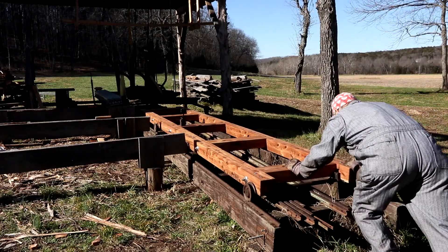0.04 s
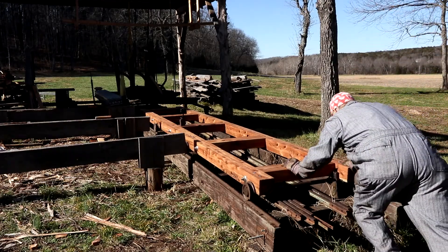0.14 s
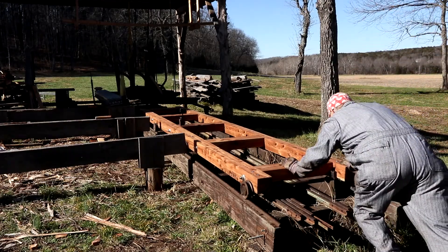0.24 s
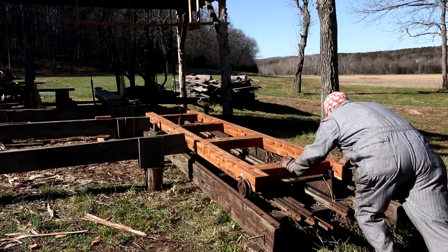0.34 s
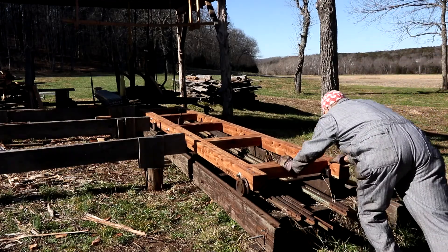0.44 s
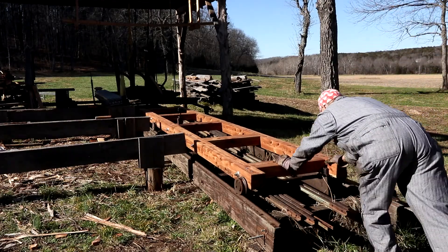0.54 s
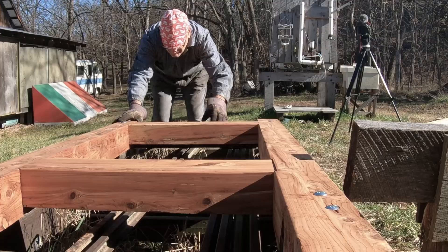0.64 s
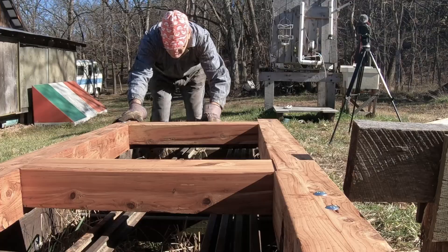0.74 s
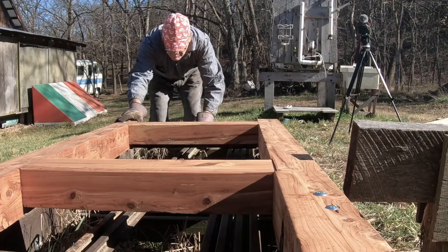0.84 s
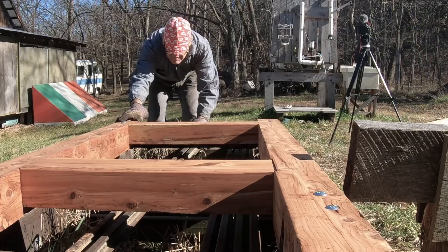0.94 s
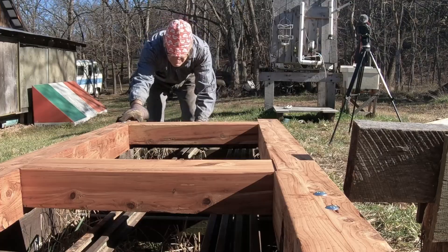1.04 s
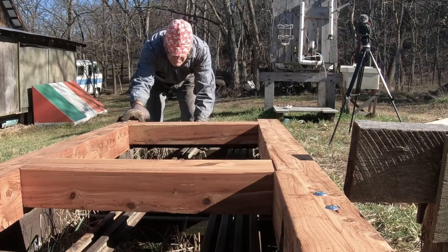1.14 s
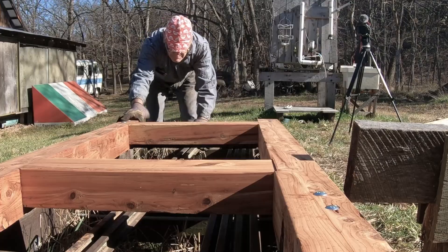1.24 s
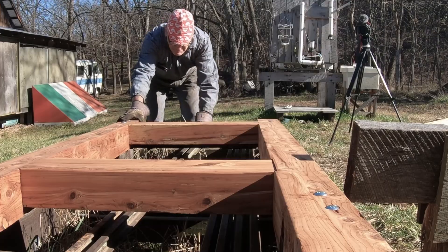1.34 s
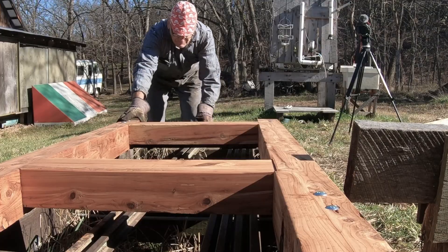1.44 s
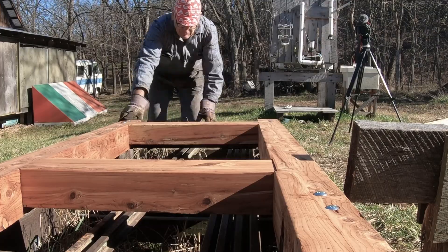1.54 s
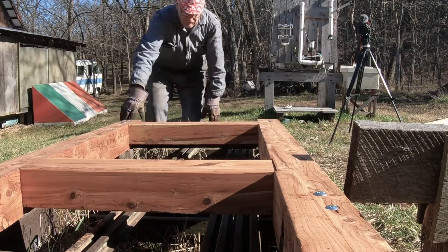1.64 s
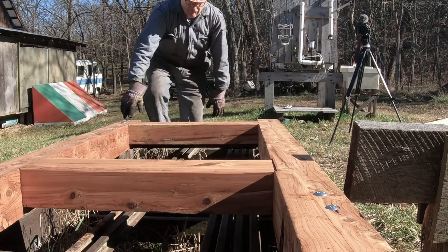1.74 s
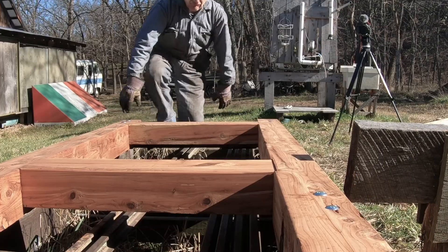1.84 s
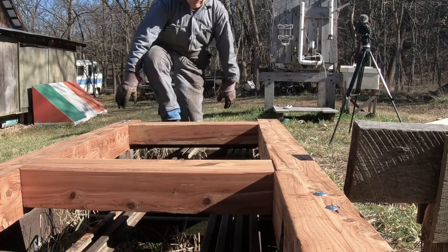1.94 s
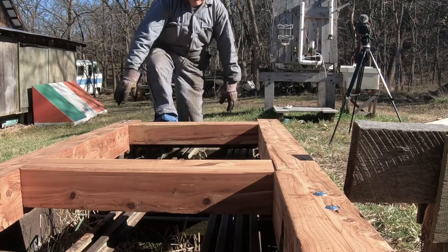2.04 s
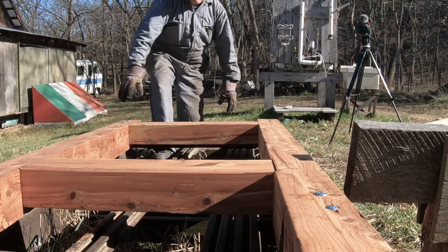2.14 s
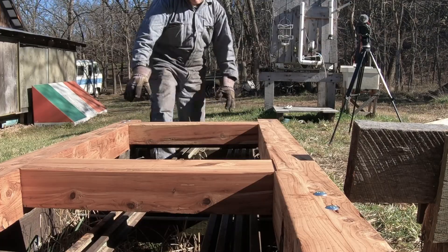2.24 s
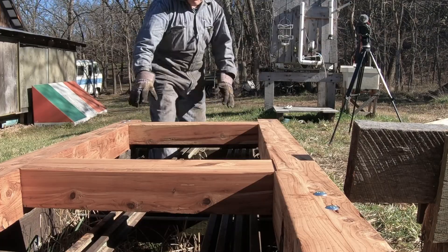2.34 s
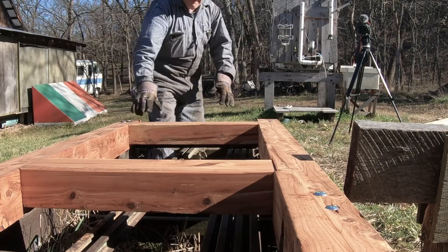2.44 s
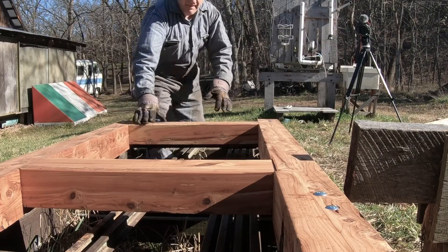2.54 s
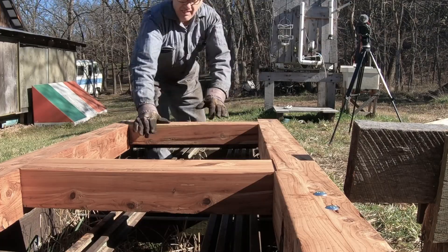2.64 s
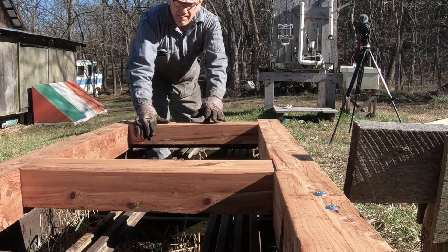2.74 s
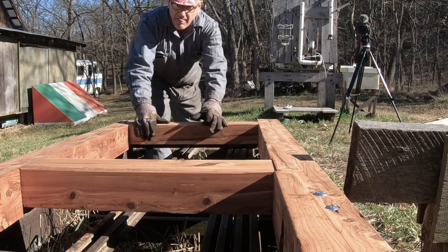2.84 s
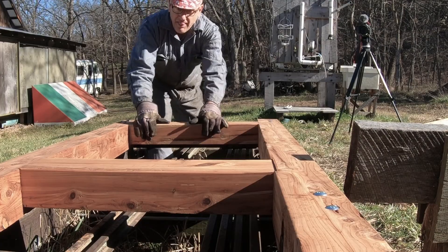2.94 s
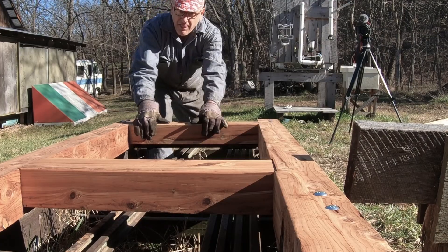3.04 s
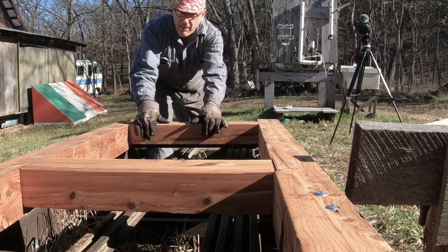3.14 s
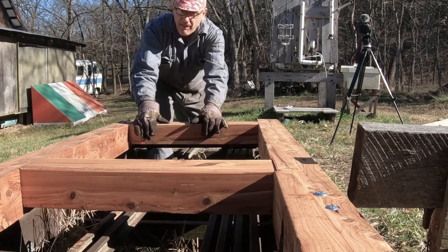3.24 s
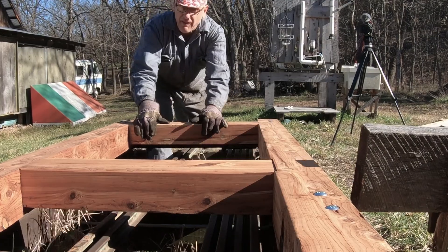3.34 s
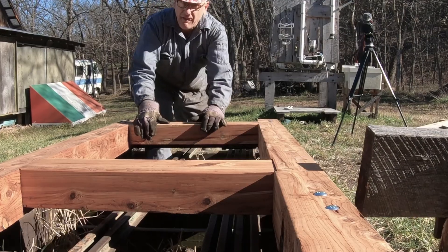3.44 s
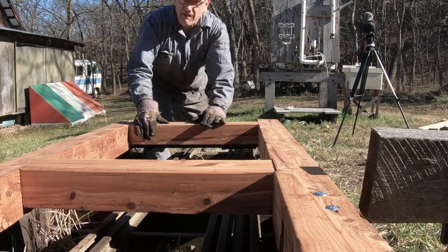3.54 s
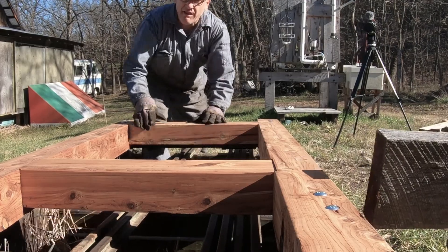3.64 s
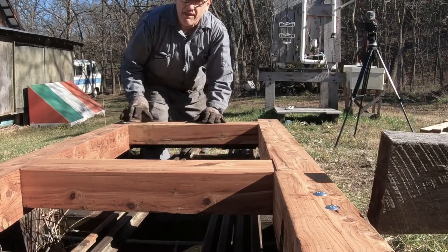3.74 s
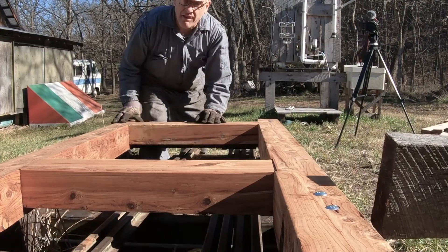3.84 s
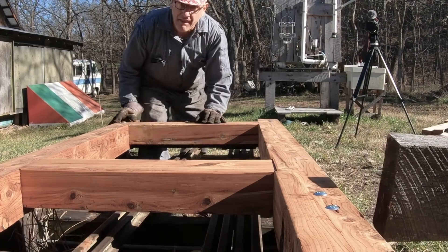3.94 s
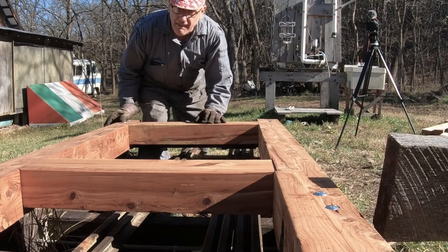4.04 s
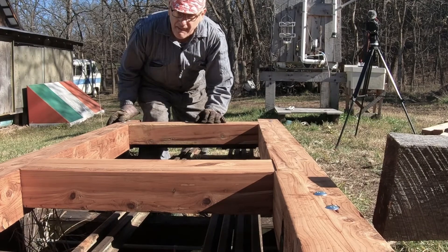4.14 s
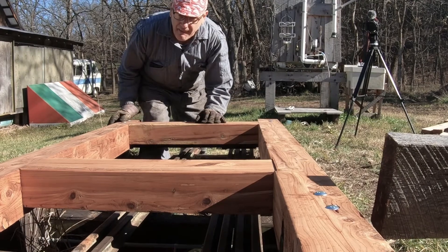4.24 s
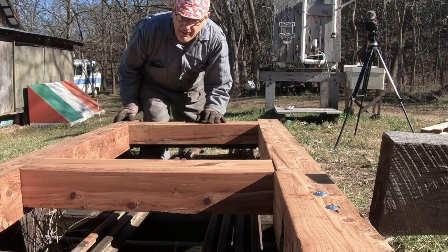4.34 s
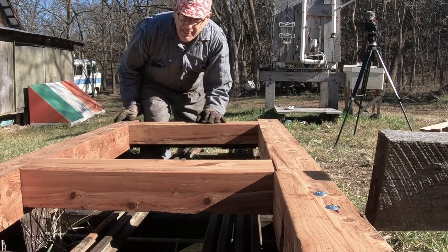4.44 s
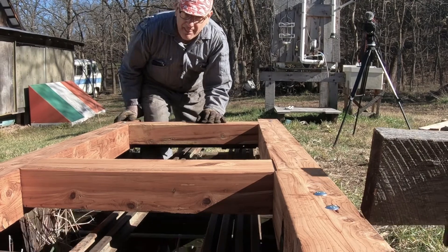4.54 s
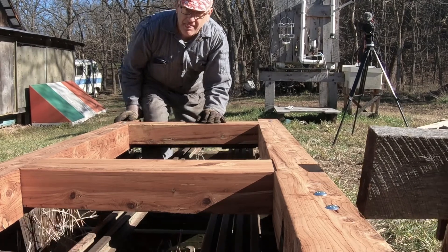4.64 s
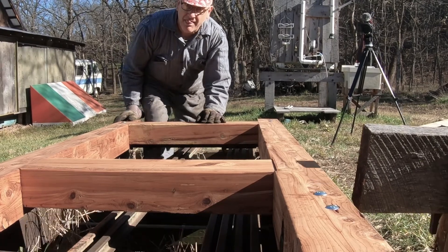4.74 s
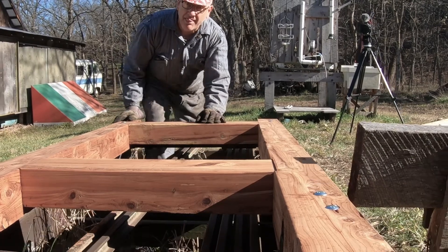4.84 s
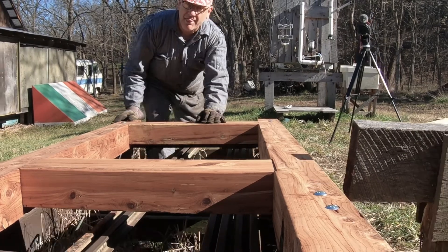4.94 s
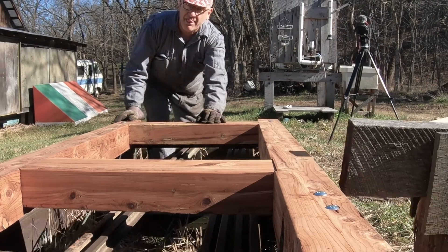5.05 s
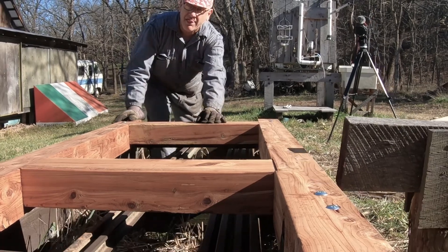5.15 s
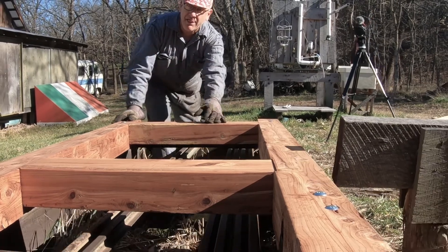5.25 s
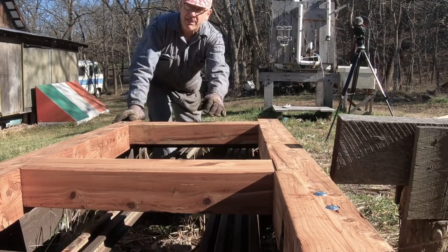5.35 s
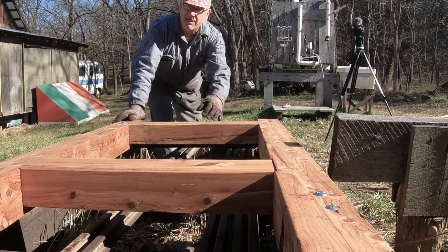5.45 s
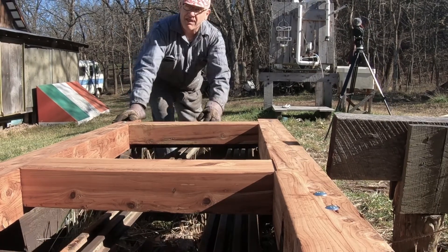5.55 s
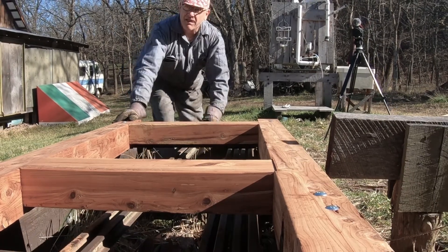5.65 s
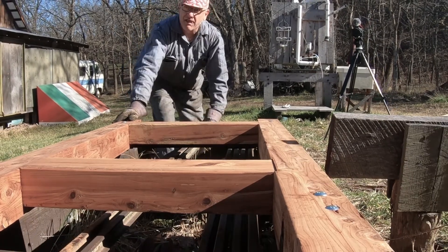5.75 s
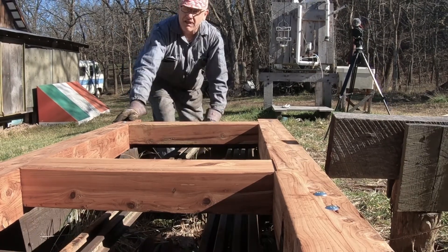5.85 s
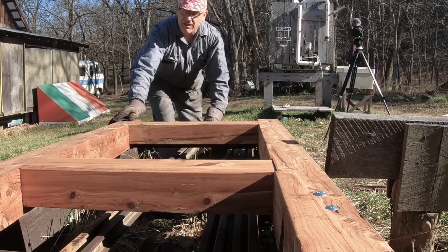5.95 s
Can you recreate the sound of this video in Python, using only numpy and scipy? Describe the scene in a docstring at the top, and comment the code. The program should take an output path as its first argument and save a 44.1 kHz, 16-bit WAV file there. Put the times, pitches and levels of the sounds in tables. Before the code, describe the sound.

A heavy timber carriage is shoved by hand outdoors, wooden knocks and iron clicks over dull rolling rumble and scuffed dry grass.

```python
"""Pushing a heavy timber carriage

A heavy timber carriage is pushed by hand along its rails outdoors.
Tiny bumps make its wheels rumble; blows ring the wooden frame and iron fittings like struck bars.
Boots scuff dry grass and stalks snap as bursts of noise, while a fitting squeaks once.
Wind noise, far engine tones, outdoor air and recorder hiss lie beneath, with a limiter on the whole."""
import sys
import numpy as np
from scipy import signal
from scipy.fft import rfft, irfft
from scipy.io import wavfile

SR = 44100
rng = np.random.default_rng(int(sys.argv[2]) if len(sys.argv) > 2 else 0)


def makeup_ratio(level_db):
    """Linear amplitude ratio for a level in decibels (20 dB per factor of ten)."""
    decades = np.asarray(level_db, float) / 20
    return 10 ** decades


def int16_out(signal):
    """Quantize to a 16-bit WAV file."""
    q = np.round(np.clip(np.atleast_2d(signal).T, -1, 1) * 32767)
    wavfile.write(sys.argv[1], SR, q.astype(np.int16))


N = 264820   # length in samples, about 6 s

# Three pushes set the wheels rolling: time_s, rumble_db
ROLLING_LEVEL = [(0.0, -53), (0.11, -58), (0.24, -39), (0.45, -35), (0.61, -37), (0.72, -46.5),
                 (0.9, -50.5), (1.13, -70), (1.7, -68), (3.4, -73), (3.53, -50), (3.62, -44), (3.67, -32.5),
                 (3.89, -29.5), (4.08, -28.5), (4.22, -34.5), (4.35, -42), (4.52, -67), (4.61, -52),
                 (4.78, -38.5), (4.85, -31.5), (5.01, -26.5), (5.24, -28.5), (5.4, -24), (5.6, -28),
                 (5.9, -30), (6.0, -36)]
# Jolts and leanings that shake the frame:
# peak_s, rumble_db, rattle_db, rise (s per 20 dB), fall (s per 20 dB)
FRAME_JOLTS = [(0.39, -33.5, -37, 0.06, 0.38), (1.08, -40, -42, 0.18, 0.07), (1.2, -47.5, -50, -0.1, 0.1),
               (1.33, -29, -29, -0.0049, 0.0648), (1.46, -51.5, -47, -0.2, 0.14),
               (1.81, -43.5, -39, 0.08, 0.07), (2.01, -64, -47, 0.25, 0.09), (2.33, -48, -63, 0.76, 0.15),
               (2.51, -38, -46, -0.16, 0.1), (2.63, -44, -44.5, -0.48, 0.5), (2.77, -34, -39, 0.05, 0.15),
               (2.96, -58, -44, -0.8, 0.45), (3.07, -46, -37, 0, 0.05), (3.3, -55, -43, -0.05, -0.68),
               (3.45, -35.5, -61.5, .03, 0.06), (4.02, -28, -28.5, 0.0448, 0.07),
               (5.32, -29.5, -36, 0.05, -0.1), (5.54, -28, -37, 0.22, -0.03), (5.66, -36, -34, 0.54, -0.27),
               (5.77, -15, -32, -0.12, -0.16)]
# Ringing modes of the timber frame, also used by knocks(): pitch_hz, relative level_db, t60_s
TIMBER_MODES = [(144, -7.5, 0.062), (197.2, -4, 0.078), (217, -2.5, 0.048), (246, -2, 0.048),
                (292, -4.5, 0.075), (350, -5, 0.078), (404.6, -4, 0.048), (486.5, -4.5, 0.046),
                (540, -4, 0.026), (618, -5.5, 0.032), (793, 6.5, 0.02), (882, -1.5, 0.047),
                (1040, 6.5, 0.015), (1201, 4.5, 0.036), (1303, -8.5, 0.044), (1420, 4, 0.018),
                (1608, -1, 0.012), (2020, -15, .03), (2220, -9, .03), (2810, -44.5, .03), (3230, -33, .03),
                (3700, -28, .03)]
RATTLE_DB, CRUISE_DB = -41.5, -30.5   # upper-mode level when the rumble is at CRUISE_DB
RATTLE_FOLLOWS = 0.48   # dB of rattle per dB of rumble


def rolling():
    """Rail roughness bumps the wheels densely; each bump shakes every mode with its own strength."""
    rumble_db, = in_time(ROLLING_LEVEL)
    rattle_db = RATTLE_DB + RATTLE_FOLLOWS * (rumble_db - CRUISE_DB)
    jolt_low, jolt_high = swells(FRAME_JOLTS, calm_db=[-90, -90])
    bumps = grains(1000 * makeup_ratio(3.0 * drift(30)), spread_db=2.5)
    low, high = np.zeros(N), np.zeros(N)
    for pitch_hz, level_db, t60_s in TIMBER_MODES:
        mode = makeup_ratio(level_db) * ring(bumps * rng.standard_normal(N), pitch_hz, t60_s)
        if pitch_hz < 700:
            low += mode
        else:
            high += mode
    rumble = rms_one(softened(low, hz=900))
    rattle = rms_one(softened(high, hz=1910))
    # hypot adds the powers of the steady rolling and the jolts
    rumble_gain = np.hypot(makeup_ratio(rumble_db), jolt_low)
    rattle_gain = np.hypot(makeup_ratio(rattle_db), jolt_high)
    return rumble_gain * rumble + rattle_gain * rattle


# Blows on the frame: start_s, peak_db (before its crack is added), centre_hz of the modes struck,
# contact_s, focus (dB lost per octave from the centre; below 0 counts as 0)
FRAME_BLOWS = [(0.193, -19, 760, 0.0066, 17), (0.328, -21, 375, 0.0012, 20), (0.381, -18, 500, 0.016, 25.5),
               (0.432, -23, 590, 0.003, 24), (0.459, -37, 444, 0.0054, 13), (0.553, -43, 450, 0.0038, -5),
               (0.609, -24, 530, 0.003, 7.5), (0.989, -20, 540, 0.0047, 59.5),
               (1.02, -25.5, 514, 0.003, 26), (1.079, -25.5, 480, 0.0042, 25), (1.16, -32, 770, 0.003, 25),
               (1.2915, -3.5, 980, 0.0066, 27), (1.344, -21, 1200.0, 0.003, 9),
               (1.824, -27, 1040.0, 0.0027, 52), (2.31, -34, 610, 0.004, 15), (2.526, -31, 445, 0.0064, 10),
               (2.628, -30, 495, 0.0052, 26), (2.743, -27, 790, 0.0038, 15),
               (2.786, -18.5, 480, 0.0024, 13), (2.867, -17.5, 1700, 0.0055, 8),
               (3.051, -25, 439, 0.0029, 24), (3.072, -21, 494, 0.003, 9), (3.321, -31, 850.0, 0.0028, 6),
               (3.417, -18, 500, 0.0053, 6.5), (3.441, -29, 900.0, 0.0041, 4),
               (3.71, -24.5, 680, 0.012, 20), (3.915, -23, 1200, 0.013, -0.5),
               (3.992, -10, 1220, 0.0094, 29), (4.237, -21, 473, 0.003, -7),
               (4.861, -23, 830, 0.0071, 47.5), (4.918, -21.5, 1034, 0.011, 18),
               (4.99, -21, 900.0, 0.0054, 30), (5.031, -21.5, 600, 0.0075, 19),
               (5.175, -28, 775, 0.0072, 24), (5.409, -30, 1080, 0.0055, 23),
               (5.457, -18.5, 810, 0.0067, 1), (5.525, -13.5, 805, 0.012, 6), (5.632, -15, 800, 0.013, 11),
               (5.731, -18.5, 746, 0.0045, 35), (5.779, -18, 740, 0.0041, 50),
               (5.885, -27, 597, 0.0079, 19)]


def knocks():
    """Blows make the timber modes ring."""
    return blows(FRAME_BLOWS, TIMBER_MODES, luck_db=3.0, hardness=1.8,
                 shudder_db=-10, shudder_s=0.018, crack_db=-9.5, crack_reach=2.87)


# Loose iron fittings clanking: start_s, peak_db (before its crack is added), centre_hz of the modes
# struck, contact_s, focus (dB lost per octave from the centre; below 0 counts as 0)
IRON_BLOWS = [(0.1945, -28, 3280, 0.0019, 17), (0.609, -24, 2430, 0.008, 8),
              (0.9506, -33, 2270, 0.0045, 10), (1.2915, -27, 2580, 0.0017, 12.5),
              (2.7312, -31, 2640, 0.0092, 8), (2.8672, -18, 2380, 0.006, 7.5),
              (3.05, -17.5, 2704, 0.0022, 15), (3.0724, -24.5, 3700, 0.0018, 22),
              (4.2542, -40.5, 2980, 0.006, -4), (4.9204, -35.5, 3130, 0.0027, 17),
              (4.972, -38.5, 3600, 0.0063, 26), (5.4487, -37, 4570, 0.0054, 10),
              (5.456, -25.5, 3480, 0.006, 11), (5.5373, -35.5, 3150, 0.003, 8),
              (5.5657, -39, 3950, 0.0028, 25)]
# Ringing modes of the iron fittings: pitch_hz, relative level_db, t60_s
IRON_MODES = [(2320, -7, 0.033), (2717, -1, 0.03), (3150, -2.5, 0.024), (3580, 2.5, 0.016),
              (4000, 0, 0.013), (4660, -2.5, 0.014), (5020, 2.5, 0.031), (5570, -44, 0.014),
              (6530, -30, .015), (7940, -1, 0.006), (9670, 2, 0.022), (10940, 2, .01), (14100, -11, .01)]


def clanks():
    """Harder, brighter blows make the iron modes ring."""
    return blows(IRON_BLOWS, IRON_MODES, luck_db=5.5, hardness=5.2,
                 shudder_db=-27, shudder_s=0.048, crack_db=-5.5, crack_reach=2.06)


def blows(events, modes, luck_db, hardness, shudder_db, shudder_s, crack_db, crack_reach):
    """A first impact, rough contact and shudder feed the modes, most near the centre; a dry crack leads."""
    out, t = np.zeros(N + SR), np.arange(SR // 6) / SR
    for start_s, peak_db, centre_hz, contact_s, focus in events:
        focus = max(focus, 0)
        pressure = np.exp(-t / max(contact_s, 2e-4)) + makeup_ratio(shudder_db) * np.exp(-t / shudder_s)
        rough = rng.standard_normal(len(t)) * np.minimum(t / 0.00039, 1) * pressure
        impact = 0.8 * np.exp(-t / 0.00018)
        force = softened(rough + impact, hz=hardness * centre_hz)
        blow = np.zeros(len(t))
        for pitch_hz, level_db, t60_s in modes:
            loss_db = focus * np.abs(np.log2(pitch_hz / centre_hz))
            mode_db = level_db + rng.normal(0, luck_db) - loss_db
            blow += makeup_ratio(mode_db) * ring(force, pitch_hz, t60_s)
        # differencing twice brightens the crack; its top is then softened twice
        crack = np.diff(rough, 2, prepend=[0, 0])
        for _ in range(2):
            crack = softened(crack, hz=crack_reach * centre_hz)
        crack_gain = makeup_ratio(crack_db - 0.52 * focus)
        blow = blow / np.abs(blow).max() + crack_gain * crack / np.abs(crack).max()
        out[round(start_s * SR):][:len(t)] += makeup_ratio(peak_db) * blow
    return out[:N]


def yard(x):
    """Ground, sheds and trees scatter back a dull, quickly dying tail."""
    t = np.arange(SR // 3) / SR
    tail = rng.standard_normal(len(t)) * makeup_ratio(-60 * t / 0.37) * np.clip(t / 0.002, 0, 1)
    tail = signal.lfilter([0.3], [1, -0.7], tail)
    tail = tail / np.sqrt(np.sum(tail ** 2))
    return x + makeup_ratio(-18) * signal.fftconvolve(x, tail)[:N]


# Boots, gloves and timbers scuffing:
# peak_s, crunch_db, sizzle_db, rise (s per 20 dB), fall (s per 20 dB)
SCUFF_SWELLS = [(0.0, -47, -52.5, .1, 0.08), (0.33, -57.5, -61.5, 1, 2), (0.49, -49.5, -59, 0.34, 0.4),
                (0.2, -62, -71, 1, .1), (0.63, -53, -62.5, 0, 0.05), (0.77, -48.5, -61, 0.04, 0.1),
                (0.9, -47.5, -54, 0.1, 0.36), (1.0, -48.5, -56, 0.27, 0.35), (1.1, -42, -50, .35, 0),
                (1.28, -49.5, -56.5, 0.35, 0.33), (1.53, -49, -57, 0.2, 0.1),
                (1.81, -42.5, -48.5, 0.18, 0.09), (1.98, -48, -57.5, 0.4, 0.15),
                (2.12, -48, -55, 0.16, 0.18), (2.31, -50, -66, 0.05, -0.1), (2.49, -45, -47.5, 0.08, 0.11),
                (2.68, -58, -57.5, 0.26, -0.1), (2.75, -36.5, -46, 0.11, 0.17), (2.82, -48, -51, 0.09, 0.3),
                (2.87, -42, -53, 0.4, 0.07), (3.01, -45.5, -65, 0.06, 0.1), (3.11, -41, -46.5, 0.2, 0.12),
                (3.3, -45, -55, .2, .08), (3.46, -56, -58, 0.1, 0.1), (3.93, -47.5, -62.5, .35, .5),
                (4.05, -49, -57, 0.5, 0.44), (4.26, -52, -60, 0.26, 0.33), (4.51, -51.5, -63, 0.5, 0.33),
                (4.66, -52.5, -62, 0.06, 0.6), (5.12, -54, -73, 1, 0.1), (5.34, -54.5, -65, 0.7, 0.1),
                (5.48, -49, -68, .1, 0.4), (5.57, -47, -77, 0.23, 0.22), (5.68, -51.5, -73, -0.7, 0.5),
                (5.99, -64, -59, -0.1, -1)]
# Tone of the lower crunch: pitch_hz, relative level (dB per Hz)
CRUNCH_TONE = [(150, -17), (400, 6.5), (1200, -1), (2500, 3.5), (4500, -2), (7000, -17.5), (12000, -74)]
# Tone of the brighter sizzle: pitch_hz, relative level (dB per Hz)
SIZZLE_TONE = [(2000, -31), (5000, 4), (8000, 2.5), (12500, 2), (15500, -2)]
RUSTLE_CRUNCH_DB, RUSTLE_SIZZLE_DB = -70, -68   # the grass never lies quite still


def scuffing():
    """Dry stalks break in dense grains over a smoother rub."""
    crunch_gain, sizzle_gain = swells(SCUFF_SWELLS, calm_db=[RUSTLE_CRUNCH_DB, RUSTLE_SIZZLE_DB])
    stalks = rms_one(grains(3000 * makeup_ratio(4.3 * drift(25)), spread_db=4.5))
    crunch = coloured(stalks + 1.2 * rng.standard_normal(N), CRUNCH_TONE, (1900, 5500))
    sizzle = coloured(stalks + 1.2 * rng.standard_normal(N), SIZZLE_TONE, (6500, 15000))
    return crunch_gain * crunch + sizzle_gain * sizzle


# Dry stalks snapping: start_s, peak_db, centre_hz
STALK_SNAPS = [(1.2244, -34, 5600), (1.3508, -28, 3780), (1.418, -32, 5350), (3.109, -27, 3800),
               (3.182, -32, 4190), (4.119, -29, 7800), (4.138, -29.5, 3650), (4.158, -32.5, 3550),
               (4.1924, -36, 4000), (4.3717, -36, 10000), (4.4248, -35.5, 3400), (4.456, -34, 3330),
               (4.4757, -37, 4000), (4.5057, -44, 5500), (4.5296, -40, 3640), (4.5987, -32, 2990),
               (4.6394, -41.5, 11000), (4.65, -36, 3960), (4.6727, -35, 3480), (5.688, -42, 4000),
               (5.792, -41, 6300), (5.9846, -37, 11800)]
CRACKLE_PER_S, CRACKLE_DB = 15, -52.5   # extra snaps at random moments; peak of the faintest


def snaps():
    """A burst of about a millisecond: a broad ring at its centre on a bright crack."""
    out, t = np.zeros(N + SR), np.arange(SR // 40) / SR
    luck = rng.random((int(CRACKLE_PER_S * N / SR), 3))
    faint = [(when * N / SR, CRACKLE_DB + 9 * size, 3300 + 7000 * pitch ** 2)
             for when, size, pitch in luck]
    for start_s, peak_db, centre_hz in list(STALK_SNAPS) + faint:
        burst = rng.standard_normal(len(t)) * np.exp(-t / 0.0012)
        crack = softened(np.diff(burst, prepend=0), hz=13700)
        snap = ring(burst, centre_hz, 7.8 / centre_hz) + 0.4 * crack
        out[round(start_s * SR):][:len(t)] += makeup_ratio(peak_db) * snap / np.abs(snap).max()
    return out[:N]


def squeak():
    """An iron fitting rubs briefly: noise excites one of its modes."""
    start_s, length_s, pitch_hz, level_db, t60_s = 5.575, 0.065, 4050, -49, 0.015
    t = np.arange(N) / SR - start_s
    shape = np.sin(np.pi * np.clip(t / length_s, 0, 1)) ** 0.5
    return makeup_ratio(level_db) * shape * rms_one(ring(rng.standard_normal(N), pitch_hz, t60_s))


# Gusts on the microphone: peak_s, thud_db, flutter_db, rise (s per 20 dB), fall (s per 20 dB)
WIND_GUSTS = [(0.17, -38, -60, 0.2, 0.2), (0.5, -49, -50.5, 1, 0), (0.68, -43.5, -57, 0.5, 1),
              (1.24, -56, -71, -2, 0.9), (2.02, -54, -72, 0, 1), (2.91, -45, -60, 1.1, 0.8),
              (3.1, -39, -44.5, 0.35, .3), (3.45, -44, -64, .12, 1.8), (3.81, -45.5, -43, 0.7, 0.4),
              (4.48, -42, -64, 0.03, -1.5), (4.64, -52, -59, 0.7, .18), (5.2, -46, -53, 0.5, -0.5),
              (5.95, -49, -45.5, 1, .3)]
BREEZE_THUD_DB, BREEZE_FLUTTER_DB = -56.5, -64   # wind between gusts


def wind():
    """Lumpy deep-bass noise: a low thud, and a flutter strongest near 105 Hz, each with its own gusts."""
    thud_gain, flutter_gain = swells(WIND_GUSTS, calm_db=[BREEZE_THUD_DB, BREEZE_FLUTTER_DB])
    # tone points: (Hz, dB per Hz)
    thud = coloured(rng.standard_normal(N), [(12, -20), (28, 5.5), (45, 4), (65, 4.5), (120, -40)])
    flutter = coloured(rng.standard_normal(N),
                       [(30, -10), (58, -1.0), (105, 14.0), (150, -16), (250, -62.0)])
    return makeup_ratio(2.0 * drift(16.0)) * (thud_gain * thud + flutter_gain * flutter)


# A far engine: time_s, pitch_hz, level_db
ENGINE_HUM = [(3.8, 88.8, -40), (4.08, 77.6, -54), (4.26, 73, -48.5), (4.48, 69.9, -45.5), (4.6, 65.5, -48),
              (4.88, 72.8, -47), (5.06, 72.6, -61), (5.26, 56.2, -61), (5.64, 63.7, -44), (5.82, 70, -50),
              (6.0, 69.2, -39)]
# A fainter, steadier far motor: time_s, pitch_hz, level_db
MOTOR_DRONE = [(1.3, 126, -60), (1.5, 127, -55.5), (1.85, 128.5, -66.5), (2.1, 134.7, -64),
               (2.7, 135.6, -56.5), (3.4, 135.5, -64), (4.3, 139.4, -59.5), (5.0, 141.5, -58)]


def far_engines():
    """Two distant machines, each heard as one wavering low tone."""
    return far_tone(ENGINE_HUM) + far_tone(MOTOR_DRONE)


def far_tone(rows):
    """A sine follows the listed pitch and level, fading in and out over a fifth of a second."""
    hz, level_db = in_time(rows)
    t = np.arange(N) / SR
    fade = np.clip(np.minimum(t - rows[0][0], rows[-1][0] - t) / 0.2, 0, 1)
    return np.sqrt(2) * makeup_ratio(level_db) * fade * np.sin(2 * np.pi * np.cumsum(hz) / SR)


# Tone of the outdoor air: pitch_hz, relative level (dB per Hz)
AIR_TONE = [(65, -4), (110, -1), (262, -3), (472, 4.5), (748, -2.5), (1370, 3.5), (1750, -8.5),
            (3450, -7.5), (9000, -50), (11700, -55), (19800, -120)]
AIR_DB = -51.5


def outdoor_air():
    """Soft shaped noise whose level wanders gently."""
    return makeup_ratio(AIR_DB + 1.7 * drift(13.4)) * coloured(rng.standard_normal(N), AIR_TONE)


def rms_one(x):
    """Scale to an average (rms) level of 1."""
    return x / np.sqrt(np.mean(x ** 2) + 1e-20)


def in_time(rows):
    """Join the table's points by straight lines, one curve per column after the time."""
    time_s, *columns = np.transpose(rows)
    return [np.interp(np.arange(N) / SR, time_s, column) for column in columns]


def drift(rate_hz):
    """Slow chance with spread 1: noise smoothed above rate_hz, made at a fortieth of SR."""
    r = np.exp(-80 * np.pi * rate_hz / SR)
    noise = rng.standard_normal(N // 40 + 2002)
    slow = signal.lfilter([1], [1, -2 * r, r * r], noise)[2000:]   # skip the filter's start-up
    return np.interp(np.arange(N) / 40, np.arange(len(slow)), rms_one(slow - slow.mean()))


def coloured(x, points, band=(20, 16000)):
    """Shape by a spectrum; rms 1 within the named band (Hz)."""
    hz, table = np.maximum(np.fft.rfftfreq(N, 1 / SR), 1), np.array(points)
    shape_db = np.interp(np.log(hz), np.log(table[:, 0]), table[:, 1])
    spectrum = rfft(x) * makeup_ratio(shape_db)
    inside = np.abs(spectrum[(hz > band[0]) & (hz < band[1])])
    return irfft(spectrum, N) * N / np.sqrt(2 * np.sum(inside ** 2))


def ring(force, hz, t60_s):
    """A mode that dies by 60 dB in t60_s, with no response at the far ends of the spectrum."""
    r, w = makeup_ratio(-60 / (t60_s * SR)), 2 * np.pi * hz / SR
    return signal.lfilter([0.5, 0, -0.5], [1, -2 * r * np.cos(w), r * r], force + 1e-18)


def grains(per_s, spread_db):
    """Random clicks of very uneven size and either sign."""
    size = makeup_ratio(spread_db * np.minimum(rng.exponential(1, N), 4)) * rng.choice([-1, 1], N)
    return size * (rng.random(N) < per_s / SR)


def softened(x, hz):
    """A yielding contact passes ever less force above its cut."""
    return signal.sosfilt(signal.butter(3, min(hz, 0.4 * SR), fs=SR, output="sos"), x)


def swells(events, calm_db):
    """Two gains: swells climb and sink at their own pace in dB; their powers add over a calm level."""
    t = np.arange(0, N, 64) / SR
    power = makeup_ratio(np.array(calm_db))[:, None] ** 2 * np.ones((2, len(t)))
    for peak_s, first_db, second_db, rise, fall in events:
        # a rise or fall under 0.01 counts as 0.01
        rising, falling = (peak_s - t) / max(rise, 0.01), (t - peak_s) / max(fall, 0.01)
        below_db = np.minimum(20 * np.where(t < peak_s, rising, falling), 90)
        power = power + makeup_ratio(2 * (np.array([[first_db], [second_db]]) - below_db))
    return [np.interp(np.arange(N) / SR, t, np.sqrt(p)) for p in power]


def scene():
    """Add all the sources, the same in both channels; only knocks and clanks get the yard's tail."""
    carriage = rolling() + yard(knocks() + clanks()) + squeak()
    grass = scuffing() + snaps()
    background = wind() + far_engines() + outdoor_air()
    mono = carriage + grass + background
    return np.stack([mono, mono])


THRESHOLD_DB, HELD_BACK = -28, 0.73   # share of the dB above the threshold that is taken away
RELEASE_DB_PER_S, SMOOTHING_S = 172, 0.007   # fall of the held level; easing of the gain


def limiter(x, dry):
    """The dry sound's loud moments pull the gain down; it then recovers steadily."""
    slope = RELEASE_DB_PER_S * np.arange(N) / SR
    power = signal.lfilter(np.ones(440) / 440, 1, dry[0] ** 2)   # average over 10 ms
    level_db = 10 * np.log10(power + 1e-12)
    held_db = np.maximum.accumulate(level_db + slope) - slope
    cut_db = HELD_BACK * np.maximum(held_db - THRESHOLD_DB, 0)
    smooth = np.exp(-1 / (SMOOTHING_S * SR))
    return x * makeup_ratio(-signal.lfilter([1 - smooth], [1, -smooth], cut_db))


def roll_off(x):
    """The treble ends steeply here."""
    return signal.sosfilt(signal.butter(12, 16600, fs=SR, output="sos"), x)


HISS_DB = -59.5   # each channel's own amplifier noise, before the limiter


def record(dry):
    """One microphone on two channels, each with its own hiss, then a limiter and a steep treble cut."""
    x = dry + makeup_ratio(HISS_DB) * rng.standard_normal(dry.shape)
    x = limiter(x, dry)
    # down by 60 dB from 16300 Hz upwards
    x = signal.sosfilt(signal.cheby2(16, 60, 16300, fs=SR, output="sos"), x)
    return roll_off(x)


dry = scene()
out = record(dry)
int16_out(out)
```